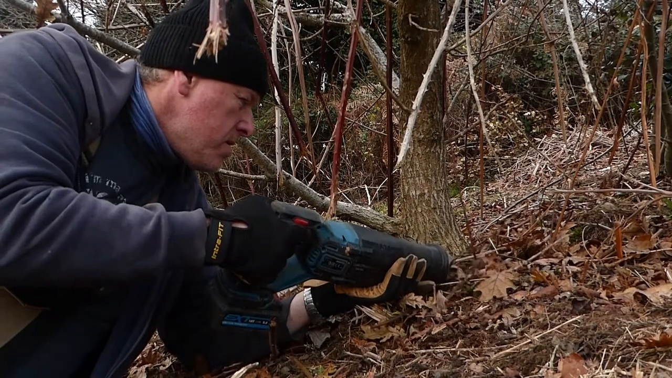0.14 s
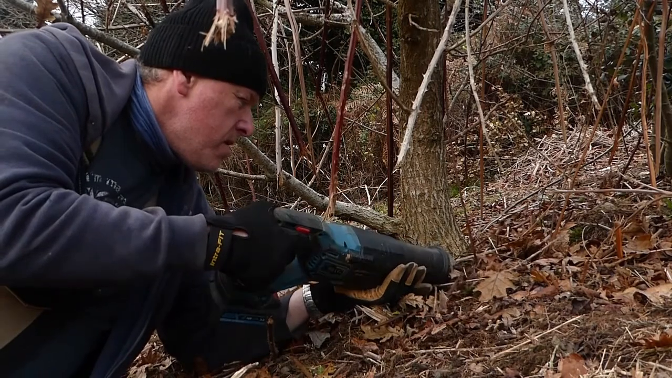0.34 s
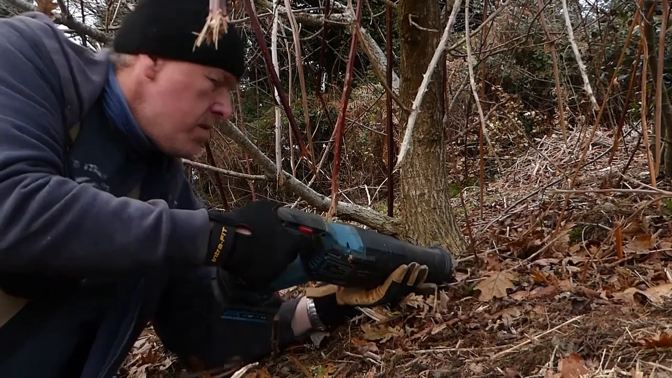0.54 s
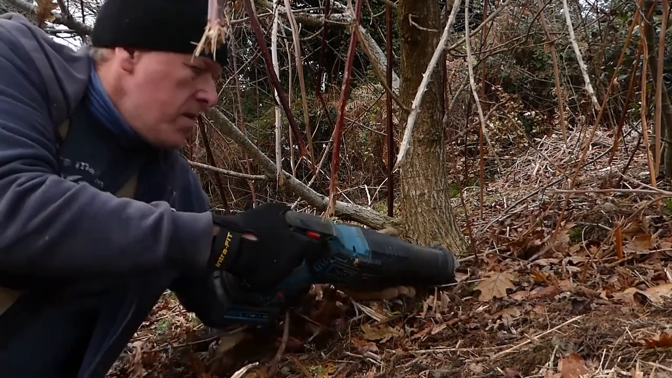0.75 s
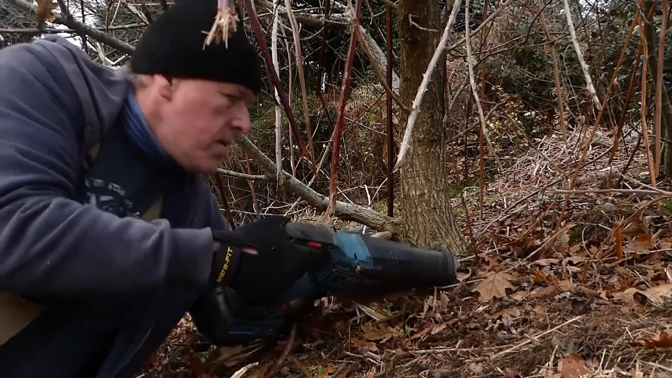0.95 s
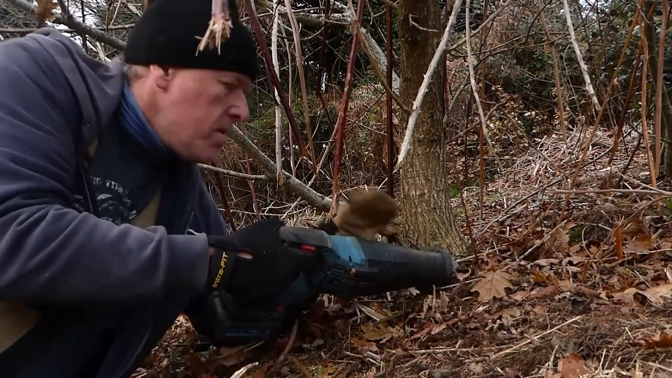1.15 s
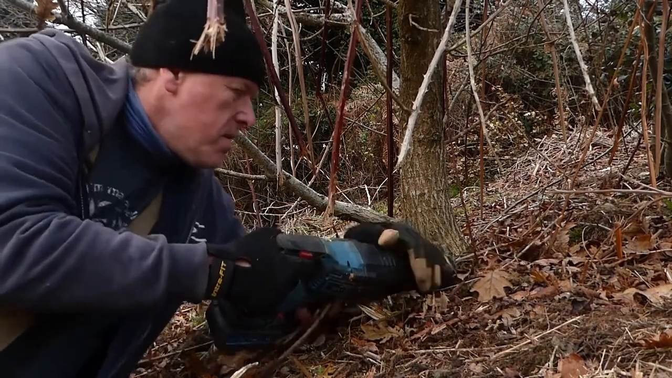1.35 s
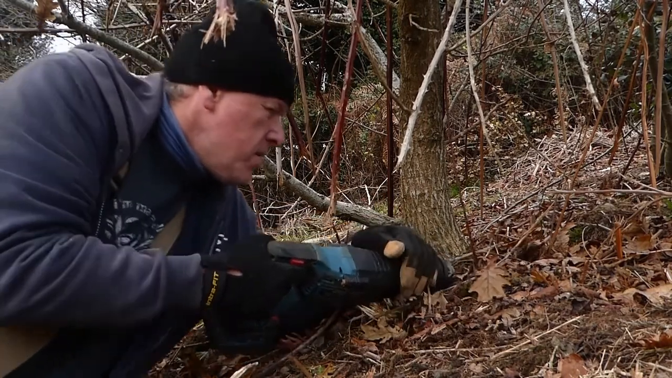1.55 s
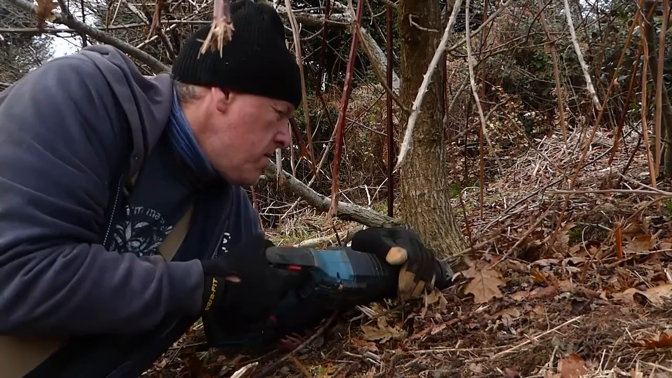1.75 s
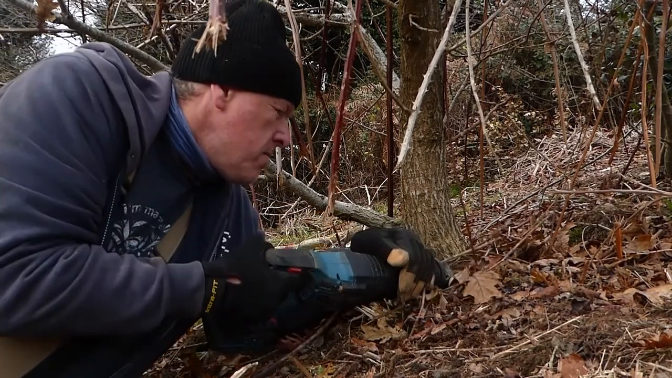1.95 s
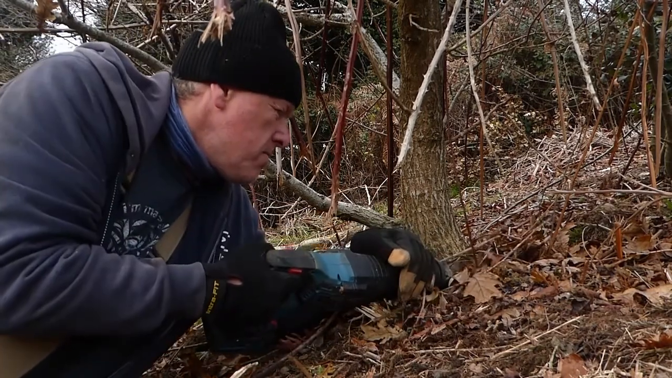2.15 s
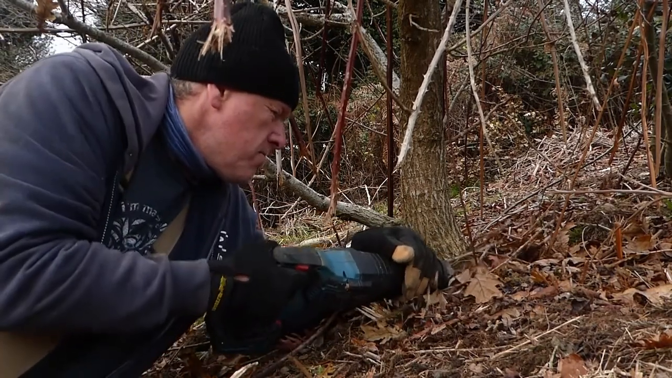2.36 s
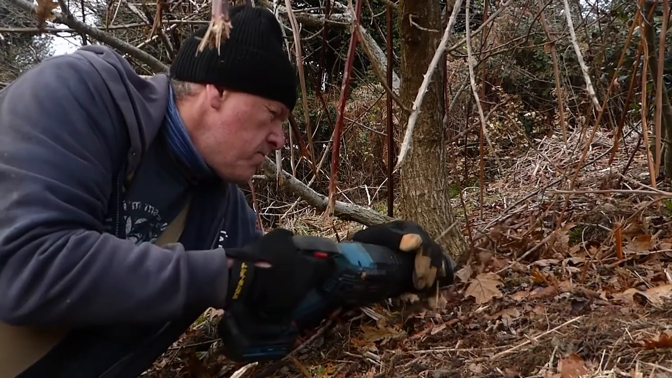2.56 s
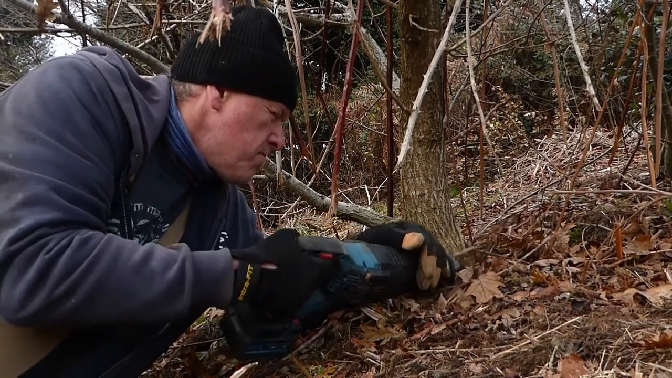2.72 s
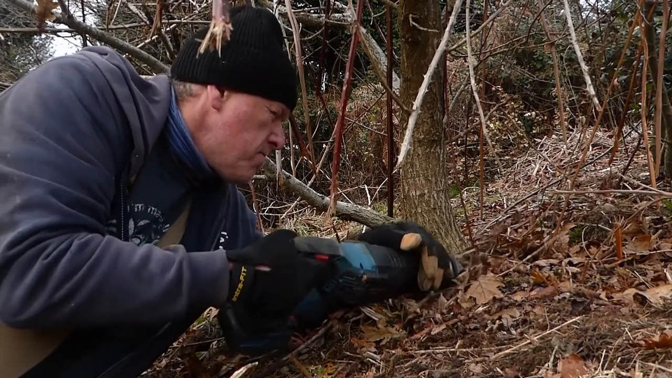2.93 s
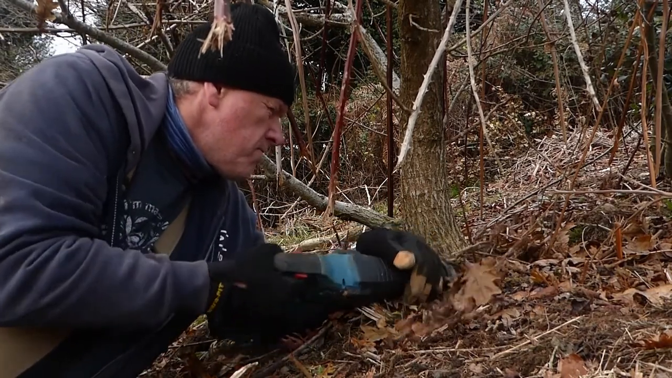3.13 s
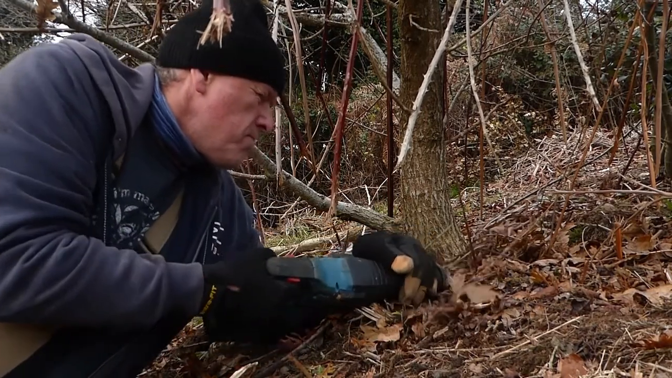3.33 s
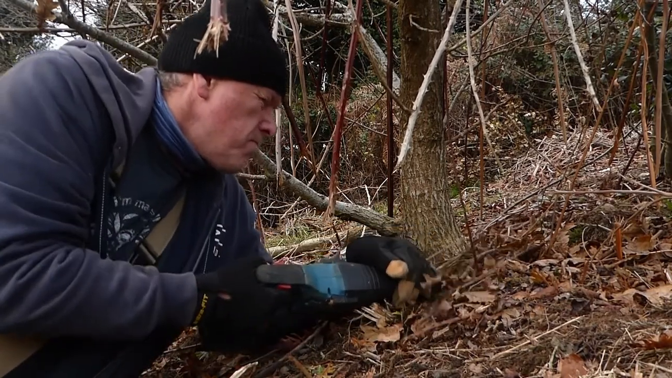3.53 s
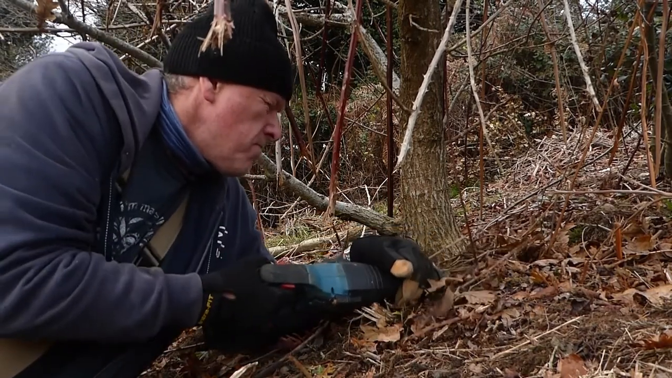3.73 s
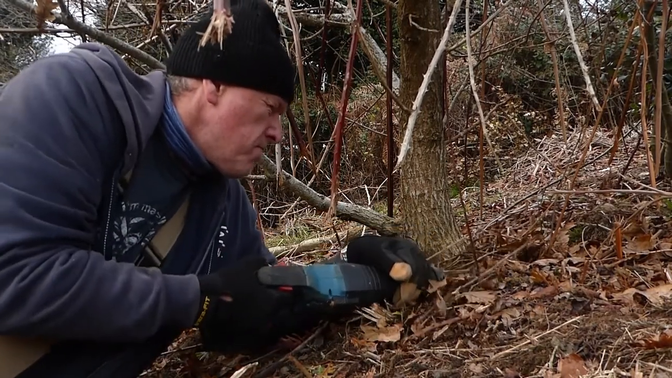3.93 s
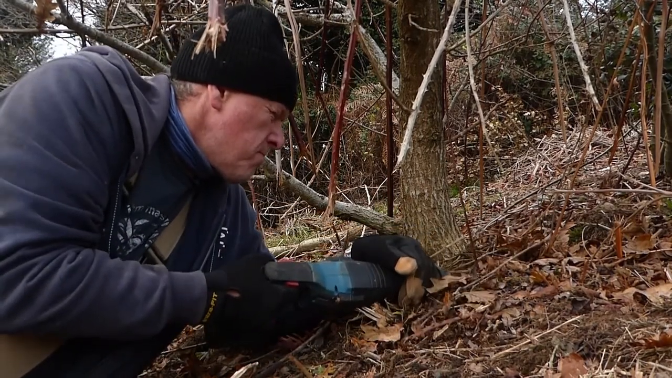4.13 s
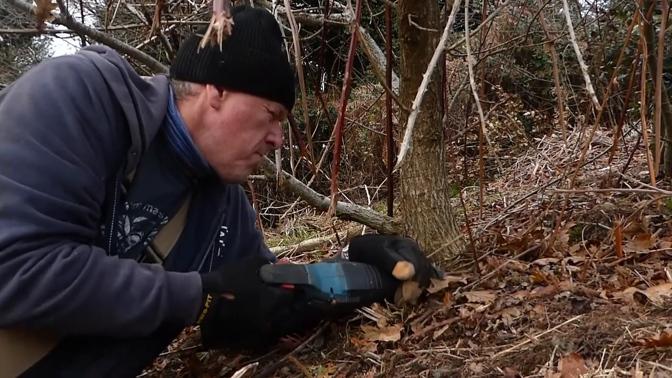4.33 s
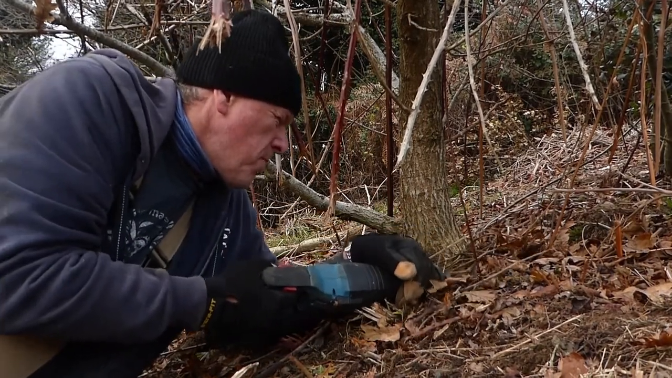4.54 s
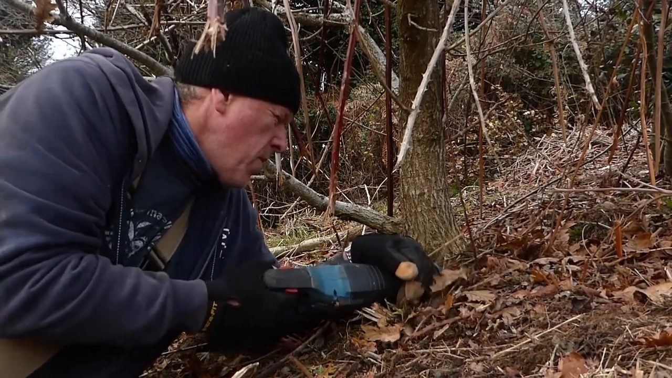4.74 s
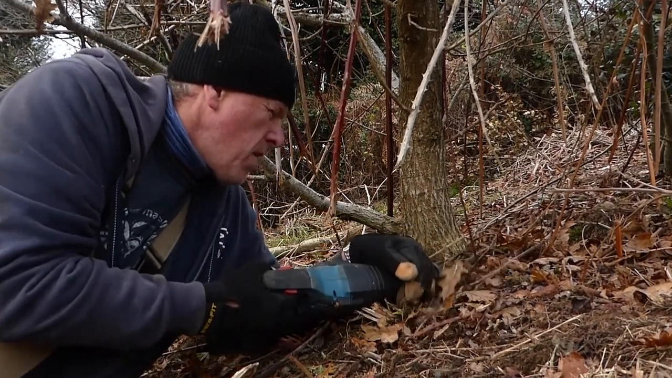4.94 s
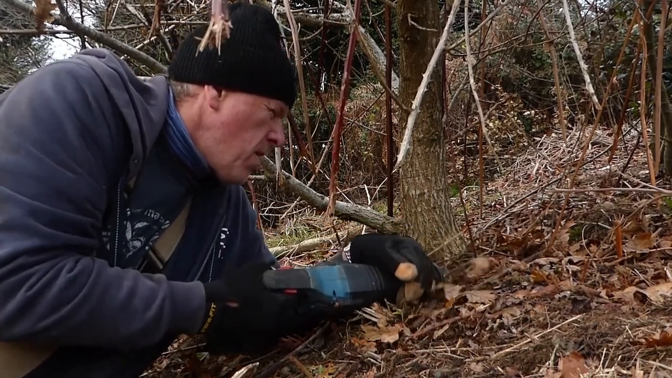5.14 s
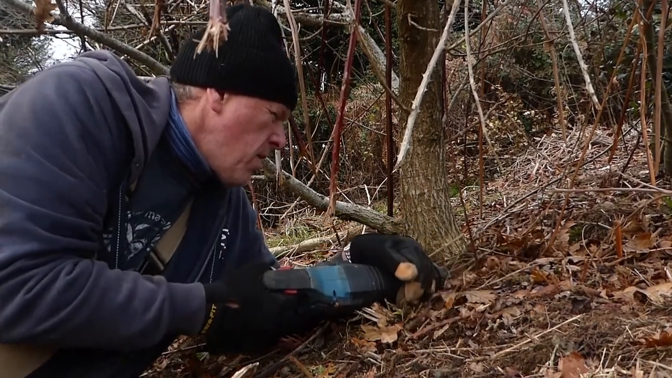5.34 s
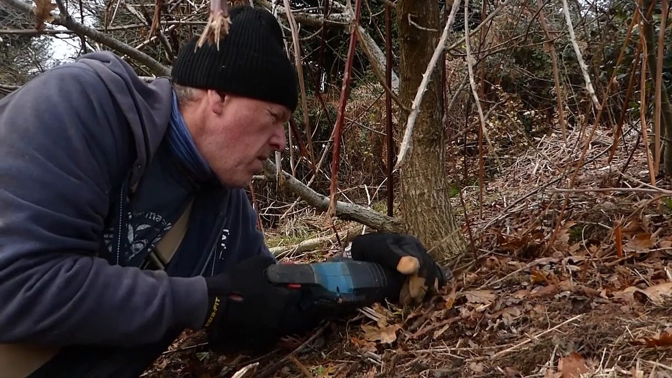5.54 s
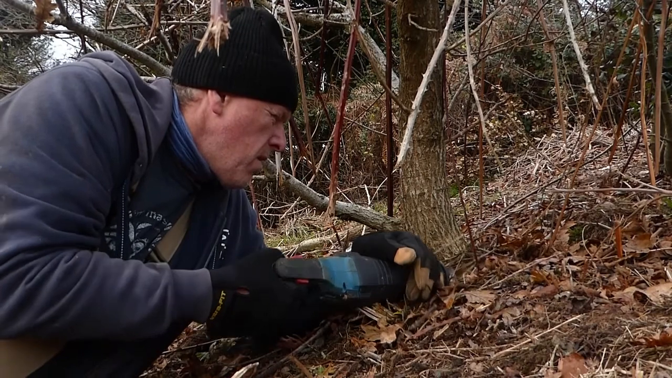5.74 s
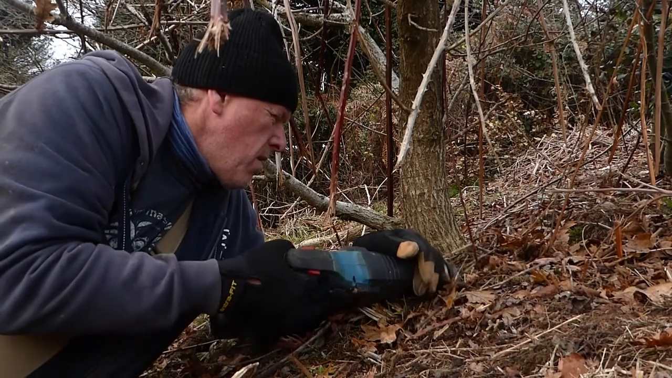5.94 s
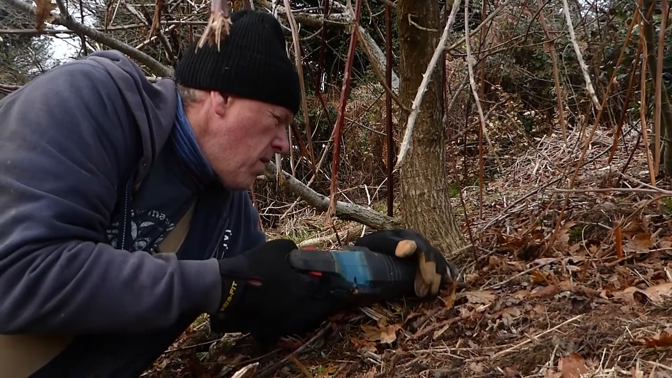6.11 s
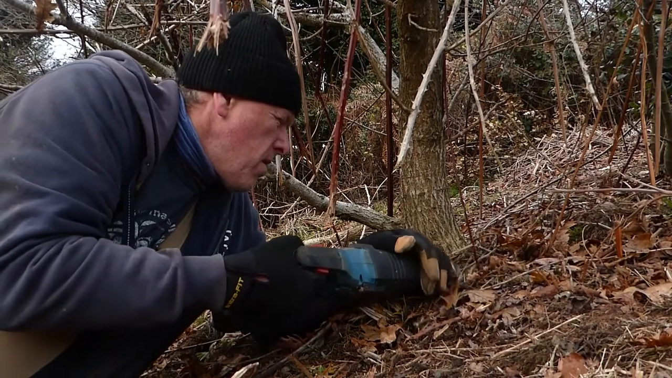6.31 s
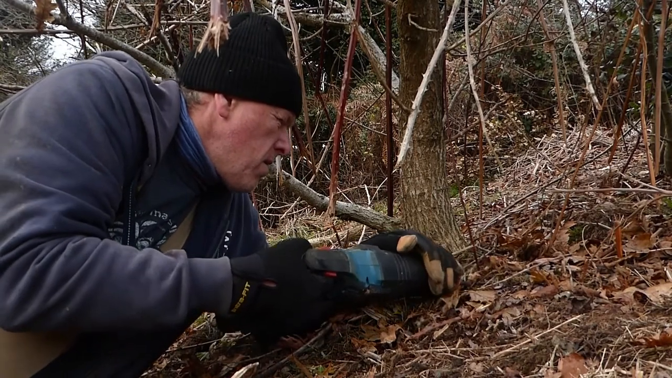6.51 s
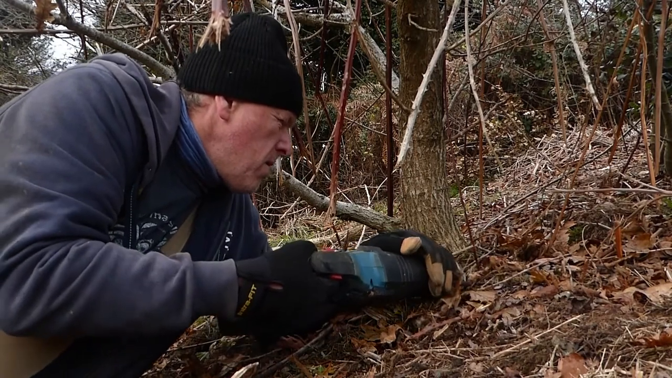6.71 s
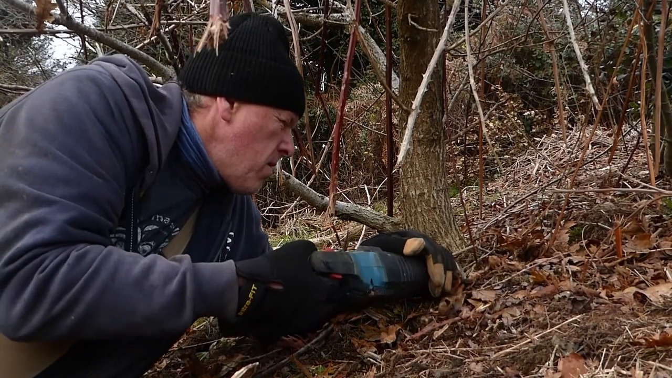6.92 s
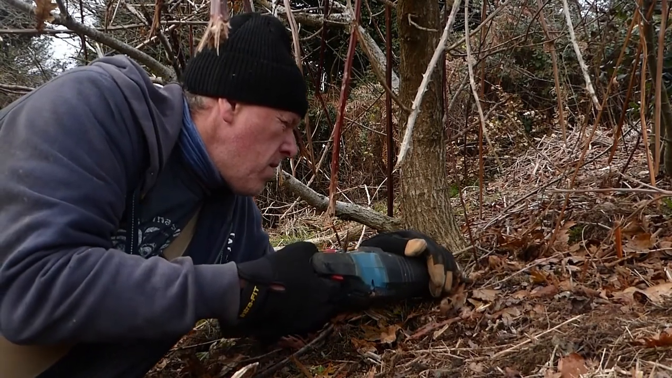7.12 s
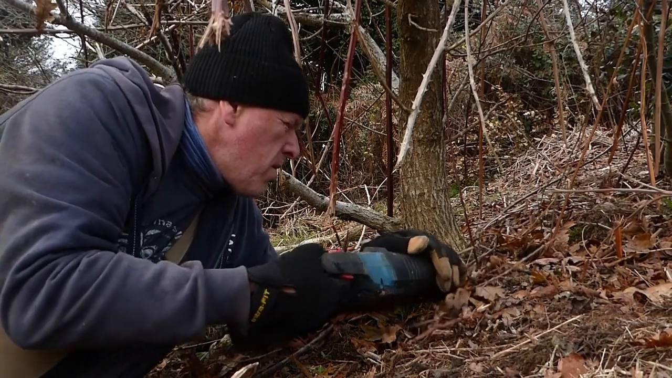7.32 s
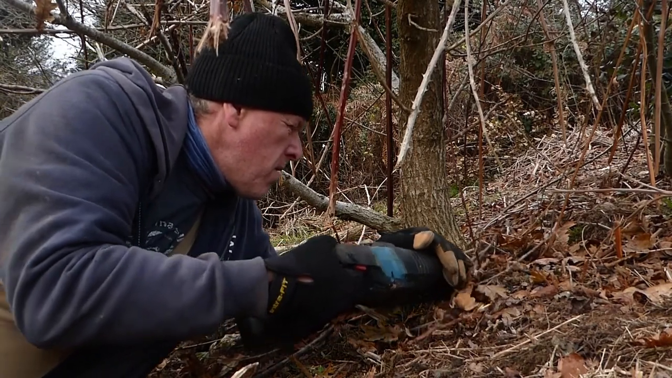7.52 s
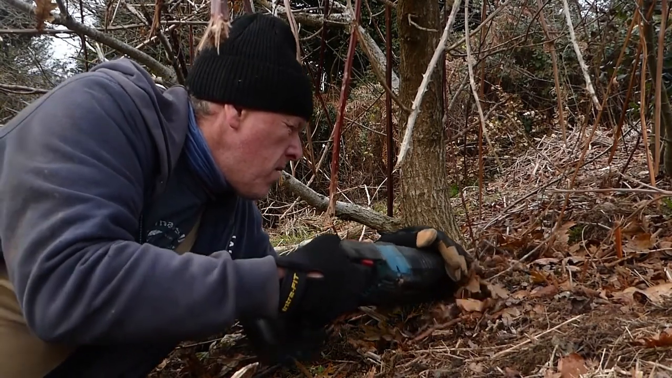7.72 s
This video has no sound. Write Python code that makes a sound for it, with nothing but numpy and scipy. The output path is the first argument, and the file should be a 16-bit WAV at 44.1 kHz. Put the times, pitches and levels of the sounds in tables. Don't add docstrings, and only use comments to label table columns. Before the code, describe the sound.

Close up in quiet woodland, a battery saw bursts briefly, stops amid glove and dry leaf rustling, then cuts hard wood in one long harsh clatter.

```python
import sys
import numpy as np
from scipy import signal
from scipy.fft import rfft, irfft, next_fast_len
from scipy.io import wavfile
from scipy.ndimage import uniform_filter1d, map_coordinates

SR = 44100
rng = np.random.default_rng(int(sys.argv[2]) if len(sys.argv) > 2 else 0)


def ratio_of_db(decibels):
    return 10 ** (np.asarray(decibels, float) / 20)


def unload_audio(sound):
    columns = np.transpose(np.atleast_2d(sound))
    steps = np.round(np.clip(columns, -1, 1) * 32767)
    wavfile.write(sys.argv[1], SR, steps.astype(np.int16))


N = 347067
STEP = 32
TIME_S = np.arange(N) / SR
CLOCK_S = np.arange(0, N + STEP, STEP) / SR
FULL_RATE_HZ = 44

# (time [s], stroke rate [1/s])
SPEED = [
    [(.12, 12.16), (.24, 42.5), (.34, 45.89), (.52, 46.24), (.61, 29.5), (.75, 12.74), (.84, 8.3)],
    [(1.67, 15.17), (1.8, 41.5), (1.88, 43.78), (2.2, 42.71), (2.36, 43.03), (2.52, 41.55), (2.6, 39.68),
     (2.76, 40.33), (3.24, 44.67), (3.4, 44.47), (3.48, 42.56), (3.64, 43.61), (4.36, 43.22), (4.6, 43.97),
     (4.76, 43.26), (5.16, 44.62), (5.56, 44.39), (6.2, 44.41), (6.6, 45.97), (6.76, 44.15), (7.24, 43),
     (7.4, 45.1), (7.48, 44.65), (7.56, 42.51), (7.72, 41.73), (7.87, 37.54)],
]
GRIPS = [0, 1.3, 2.47, 3.15, 4.62, 5.75, 6.42, 7.45]


def unit(x):
    return x / np.sqrt(np.mean(x ** 2) + 1e-20)


def along(points, hz):
    f, v = np.transpose(points)
    return np.interp(np.log(hz + 1), np.log(f + 1), v)


def curves(tables, off):
    out = np.full((len(tables[0][0]) - 1, N), float(off))
    for rows in tables:
        s, *cols = np.transpose(rows)
        inside = (TIME_S >= s[0]) & (TIME_S <= s[-1])
        out = np.where(inside, [np.interp(TIME_S, s, c) for c in cols], out)
    return out


def smooth(controls):
    return [np.interp(TIME_S, CLOCK_S, c) for c in controls]


def wobble(rate_hz):
    knots = rng.standard_normal(int(N * rate_hz / SR) + 4)
    return np.interp(TIME_S, CLOCK_S, map_coordinates(knots, [CLOCK_S * rate_hz]))


def swell(peak_s, rise_s, fall_s):
    t = CLOCK_S - peak_s
    return np.exp(np.where(t < 0, t / rise_s, -t / fall_s))


def present_grip():
    return np.searchsorted(GRIPS, CLOCK_S, side="right") - 1


def filtered(x, gain):
    m = next_fast_len(len(x) + 8192)
    cepstrum = irfft(np.log(gain(np.fft.rfftfreq(m, 1 / SR)) + 1e-6), m)
    cepstrum[1:m // 2] *= 2
    cepstrum[m // 2 + 1:] = 0
    return irfft(rfft(x, m) * np.exp(rfft(cepstrum)), m)[:len(x)]


def noise(spectrum):
    return unit(filtered(rng.standard_normal(N), lambda hz: ratio_of_db(along(spectrum, hz))))


def air():
    # (frequency [Hz], density [dB/Hz])
    air_tone = [(15, -44), (25, -30), (216, 4), (587, -12), (981, -6), (1640, -18), (1980, -18),
                (4000, -22), (11400, -27), (13800, -27), (15800, -46)]
    level_db, side_db = -52.5, -18
    mid = ratio_of_db(level_db) * noise(air_tone)
    side = ratio_of_db(level_db + side_db) * noise(air_tone)
    return mid, side


def rustle():
    # (peak [s], rise [s], fall [s], body level [dB], hiss level [dB])
    stirs = [(0, .01, 1, -68, -74), (.86, 0.012, 0.041, -37.5, -47), (.94, 0.035, 0.045, -58, -46),
             (1.07, 0.077, 0.095, -51, -53.5), (1.25, .04, .1, -67, -58), (1.32, 0.015, .04, -53, -46),
             (1.355, 0.023, 0.03, -48, -47), (1.4, .03, 0.017, -48, -46), (1.45, .02, .04, -58, -55),
             (1.537, 0.0091, 0.011, -59, -46), (1.62, 0.036, 0.026, -47, -68), (1.6, 0.23, 0.064, -52, -48)]
    # (frequency [Hz], density [dB/Hz])
    body_tone = [(120, -13), (200, -9.5), (433, -9.5), (474, -9.5), (2200, -20), (2860, -60), (4840, -120)]
    hiss_tone = [(1060, -18), (1800, 7), (8830, 4.5), (11100, 4.5), (12600, 0), (15800, -4)]
    swells = [ratio_of_db(np.c_[levels_db]) * swell(s, rise, fall) for s, rise, fall, *levels_db in stirs]
    low, high = smooth(sum(swells))
    lumps = wobble(110)
    cloth = low * ratio_of_db(2.2 * lumps) * noise(body_tone)
    leaves = high * ratio_of_db(1.3 * lumps + 1.6 * wobble(460)) * noise(hiss_tone)
    return cloth + leaves


def ticks():
    # (time [s], peak level [dB], pitch [Hz], low knock level [dB])
    snaps = [(0.039, -32, 5200, -17), (0.845, -14, 2900, -12), (.857, -28, 9500, -25),
             (.927, -30, 9500, -25), (1.0434, -35, 11500, -25), (1.12, -36, 11500, -25),
             (1.19, -39, 12500, -25), (1.5028, -29, 12000, -23), (1.43, -31, 4520, -8),
             (0.9133, -22, 11400, -17), (0.9424, -17.5, 3230, -8), (0.9608, -22, 2810, -21),
             (0.9746, -26, 2200, -5.5), (1.0006, -26, 2860, -17), (1.07, -30, 4960, -22),
             (1.132, -27, 6000, -11), (1.2206, -42, 3660, -16), (1.244, -31, 3740, -25),
             (1.3546, -33, 3730, -4), (1.5224, -26, 2910, -33), (1.5394, -25, 9160, -23),
             (1.5653, -25, 4700, -28), (1.584, -28, 3220, -17), (1.612, -26, 3280, -17)]
    snap_t60_s, knock_t60_s = .024, .03
    out, t = np.zeros(N + SR), np.arange(1500) / SR
    for s, db, hz, low_db in snaps:
        snap = rng.standard_normal((2, len(t))) * ratio_of_db(-60 * t / snap_t60_s)
        slow = uniform_filter1d(uniform_filter1d(snap[1], size=14), size=14)
        ring = .025 * snap[0] + 3.6 * slow * np.sin(2 * np.pi * hz * t)
        modes = sum(np.sin(2 * np.pi * f * t) for f in (480, 820, 1400))
        dull = modes * ratio_of_db(low_db + 1 - 60 * t / knock_t60_s)
        out[round(s * SR):][:len(t)] += ratio_of_db(db - 6) * (ring + dull)
    return out[:N]


def loudness():
    # (switch clack [s], motor grabs [s], released [s], blade stalls [s])
    runs = [
        (.108, 0.148, .52, 0.828),
        (1.649, 1.687, 5.3, 7.85),
    ]
    # (after pull [ms], thump [dB], knock [dB], housing [dB], song [dB])
    clacks = [
        (2, -58, -60, -25.5, -61),
        (14, -29, -30, -48, -57),
    ]
    # (thump [dB], knock [dB], housing [dB], song [dB])
    grip_db = [(-31.5, -28, -19, -28.5), (-28.5, -24, -20, -28), (-27, -25.5, -20.5, -26.5),
               (-28.5, -23, -21, -30), (-30, -23.5, -21.5, -30.5), (-29, -25, -21, -26),
               (-29.5, -26.5, -20.5, -27.5), (-31, -27, -20, -27.5)]
    # (time [s], level [dB], length [s])
    snags = [(1.742, 8, 0.064), (2.53, 3.5, 0.11), (2.85, 1, .25), (3.088, 4, 0.11), (3.866, 0.5, 0.11),
             (4.194, 3, 0.21), (4.3, 1, 0.089), (5.173, 4.5, 0.044), (6.563, 1, 0.13), (7.48, 1, 0.068)]
    # snag share [dB/dB], coast loss [dB per dB of speed], stall [dB/s]
    snag_share = [0.76, 0.29, 0.41, 0.56]
    coast = [0.53, 0.63, 0.94, 1]
    stall_db_per_s = [150, 220, 200, 250]
    # motor surge before the teeth bite [dB], its fall [s], unsteadiness [dB]
    surge_peak_db = [5.3, 6.6, 7.2, 2.5]
    surge_fall_s = [0.025, 0.013, 0.019, 0.066]
    unsteady_db = [0.43, 0.21, 0.2, 0.32]
    regrip_s, grab_rise_s = .48, .0086
    clack_rise_s, clack_fall_s = .0017, .015

    t, col = CLOCK_S, lambda v: np.c_[v]
    held_db = np.transpose(grip_db)[:, present_grip()]
    held_db = uniform_filter1d(held_db, size=round(regrip_s * SR / STEP), axis=1)
    held_db = held_db + col(snag_share) * sum(db * swell(s, length / 2, length / 2) for s, db, length in snags)
    rate = np.interp(t, TIME_S, curves(SPEED, 0)[0])
    slowed_db = 20 * np.log10(np.clip(rate / FULL_RATE_HZ, .16, 1))
    gain = np.zeros((4, len(t)))
    for (pull, grab, release, stall), (stop, *_) in zip(runs, runs[1:] + [(N,)]):
        lost_db = col(coast) * slowed_db * (t > release)
        lost_db = lost_db - col(stall_db_per_s) * np.maximum(t - stall, 0)
        surge_db = col(surge_peak_db) * [swell(grab, 1, fall) for fall in surge_fall_s]
        on = np.where(t < grab, swell(grab, grab_rise_s, 1), 1) * (t > pull) * (t < stop)
        clack = sum(ratio_of_db(col(levels_db)) * swell(pull + ms / 1000, clack_rise_s, clack_fall_s)
                    for ms, *levels_db in clacks)
        gain += on * ratio_of_db(held_db + lost_db + surge_db) + clack * (t > pull)
    low_high = np.array([wobble(14), wobble(15)])[[0, 0, 1, 1]]
    return smooth(gain) * ratio_of_db(col(unsteady_db) * (wobble(9) + low_high))


def contacts(return_db, scatter_db, jitter_ms):
    start_turn = [.765, .03]
    first_bite = [.17, 1.71]
    # (after stroke end [ms], thump [dB], knock [dB], housing [dB], song [dB], timing drift [ms])
    forward = [
        (-3.2, -13, -4, -3, -3, .2),
        (-1.9, 0, -8, -3.5, -3, .1),
        (-.5, -11, 0, 0, 0, .06),
        (1.2, -30, -12, -7, -3, .3),
        (3.4, -12, -16, -12, -2, .4),
    ]
    backward = [
        (-2.5, -5, -7, -9, -5, .15),
        (-0.5, -30, 0, 3, 4.5, .1),
        (2, -32, -6, -10, 3, .4),
    ]
    recoil = (-.6, -6, -30, -30, -30, .4)
    # (stroke phase [half turns], share of return_db, contact)
    blows = [(0, 0, c) for c in forward] + [(1, 1, c) for c in backward] + [(.98, .04, recoil)]
    hits = np.zeros((4, N))
    for rows, start, bite in zip(SPEED, start_turn, first_bite):
        t = np.arange(round(rows[0][0] * SR), min(N, round(rows[-1][0] * SR)))
        speed = np.interp(t / SR, *np.transpose(rows))
        turn = start + np.cumsum(speed) / SR
        whole = np.arange(int(turn[-1]) + 2)
        for back, play, (after_ms, *levels_db, drift_ms) in blows:
            chance = rng.standard_normal((len(whole), 6))
            end = np.interp(whole + back / 2, turn, t)
            pinch = np.where((end > 3 * SR) & (end < 3.4 * SR), 2.5, 1)
            drift = unit(uniform_filter1d(chance[:, 0], size=15))
            late_ms = after_ms + drift_ms * .66 * drift + jitter_ms * pinch * chance[:, 1]
            at = (end + late_ms * SR / 1000).astype(int).clip(0, N - 1)
            live = (end > bite * SR) & (whole + back / 2 < turn[-1])
            slow = (FULL_RATE_HZ / np.interp(at, t, speed)) ** .25
            scatter = np.c_[scatter_db] * chance[:, 2:].T
            size = ratio_of_db(np.array(levels_db)[:, None] + play * return_db[:, at] + scatter)
            hits[:, at[live]] += (slow * size)[:, live]
    return hits


def rasp(hits, drag_db, rise_ms, fall_ms, steady_db, grit_db):
    t_ms = np.arange(900) / SR * 1000
    shape = (1 - np.exp(-t_ms / rise_ms)) * np.exp(-t_ms / fall_ms)
    flare = signal.fftconvolve(hits, shape)[:N]
    grit = ratio_of_db(grit_db * wobble(700)) * rng.standard_normal(N)
    steady = ratio_of_db(steady_db + drag_db + .16 * wobble(60))
    return unit((unit(flare) + steady) * grit)


def shake():
    # (multiple of stroke rate, level [dB re thump])
    inertia = [(2, -65), (3, -22.5), (4, -18), (5, -13), (6, -17)]
    multiples = [
        [5, 7],
        [7, 9, 10, 19, 23],
        [5, 8, 9, 19],
        [7, 8, 9, 10, 22, 23, 24, 29, 31],
        [8, 10, 12, 14, 15, 17, 23, 24],
        [14, 15, 17, 21, 23, 24],
        [8, 11, 21, 22, 23, 24],
        [5, 6, 7, 8, 14, 23],
    ]
    multiples_db = [
        [-15, -30],
        [-4.5, -9, -13, -9, -5],
        [-16, -8, -11, -9.5],
        [-12, -8, -7.5, -9, -6.5, -7.5, -12, -9.5, -8.5],
        [-10, -12, -12, -10, -9.5, -14, -7, -22],
        [-7, -14, -9, -11, -11, -19],
        [-11, -9, -13, -13, -12, -14],
        [-6.5, -8, -7, -9, -6.5, -12],
    ]
    speed = curves(SPEED, 0)[0]
    angle = 2 * np.pi * np.cumsum(speed) / SR
    force = np.minimum(speed / 40, 1) ** 8
    grip, sway = present_grip(), wobble(5)[::STEP]
    gains = {}
    for g, rows in enumerate(zip(multiples, multiples_db)):
        share = uniform_filter1d(1. * (grip == g), size=250)
        for k, db in zip(*rows):
            gains[k] = gains.get(k, 0) + ratio_of_db(db) * share
    total = np.zeros(N)
    for k, gain in zip(gains, smooth(gains.values())):
        drift_db = 3 * np.roll(sway, 97 * k)[np.arange(N) // STEP]
        total += gain * ratio_of_db(drift_db) * np.sin(k * (angle + 1.45))
    for k, db in inertia:
        total += ratio_of_db(db + .35 * k * wobble(4)) * np.sin(k * angle + k * k)
    return force * total


def body(x, grips, tone, lift_db):
    which = np.searchsorted(GRIPS, TIME_S, side="right") - 1
    out = np.zeros(N)
    for k, modes in enumerate(grips):
        share = uniform_filter1d(1. * (which == k), size=9000)
        held = np.flatnonzero(share > 1e-6)
        span = slice(held[0], held[-1] + 1)

        def response(f):
            peaks = sum(ratio_of_db(db + lift_db) ** 2 / (1 + (2 * (f - c) / w) ** 2) for c, w, db in modes)
            return ratio_of_db(along(tone, f)) * np.sqrt(1 + peaks)
        out[span] += share[span] * unit(filtered(x[span], response))
    return out


def thump(hits, drag_db):
    # (frequency [Hz], width [Hz], level [dB])
    modes = [
        [(209, 19, 9)],
        [(304, 4.6, 4), (398, 2.8, 9)],
        [(210, 18, 19), (330, 30, 16), (379, 20, 23), (500, 270, 17.5)],
        [(363, 210, -5)],
        [(350, 170, 6), (437, 11, 11), (540, 35, 4.5)],
        [(312, 84, 11), (458, 36, 13), (643, 14, 16.5)],
        [(315, 22, 5), (475, 15, 9)],
        [(197, 15, 22), (340, 110, 8), (610, 49, 8)],
    ]
    # (frequency [Hz], level [dB])
    tone = [(60, -89), (150, -44.5), (240, -6), (300, 4), (550, 1.5), (900, -4.5), (2000, -62)]
    push = unit(hits) + ratio_of_db(-8.5) * rasp(hits, drag_db, .6, 4, steady_db=5, grit_db=1.5)
    return ratio_of_db(-.5) * body(push, modes, tone, lift_db=3) + ratio_of_db(2) * shake()


def trunk(hits, drag_db):
    # (frequency [Hz], width [Hz], level [dB])
    modes = [
        [(764, 1900, 6), (1330, 56, -3)],
        [(790, 64, 1.7), (970, 410, 2.9), (1270, 150, 2.8)],
        [(793, 15, -4), (1017, 40, -0.5)],
        [(805, 28, -11), (990, 120, -8), (1320, 150, -9)],
        [(1050, 350, 3.5), (1380, 120, 1.4), (1920, 100, 15.6)],
        [(1100, 260, 3), (1613, 26, 13.5), (1870, 64, 12)],
        [(1050, 110, -0.5), (1610, 36, 10), (1850, 52, 10)],
        [(963, 51, 0), (1293, 30, 0)],
    ]
    # (frequency [Hz], level [dB])
    tone = [(300, -44), (600, 0), (1400, -1), (1650, -15.5), (2100, -16), (4000, -60.5)]
    knock = unit(hits) + ratio_of_db(-6) * rasp(hits, drag_db, .5, 1.6, steady_db=-1.5, grit_db=1.5)
    return body(knock, modes, tone, lift_db=9)


def housing(hits, drag_db):
    # (frequency [Hz], width [Hz], level [dB])
    modes = [
        [(2910, 250, -3), (3800, 790, -3), (4970, 190, -0.5), (6300, 190, -13)],
        [(2200, 300, 1.1), (3030, 1300, 0.83), (4050, 390, 0), (6320, 190, 1.5)],
        [(3220, 1100, -5.5), (4370, 29, 3), (6500, 520, -1.5)],
        [(2450, 1000, -2), (3170, 5.9, 11.5), (4170, 490, 0.5), (6390, 47, 5.5)],
        [(2000, 180, -31), (2860, 180, -3.5), (4120, 410, -3.5), (6470, 130, -0.5)],
        [(1910, 92, -2), (3400, 1000, -4.5), (4970, 110, -5), (6220, 67, 3.5)],
        [(2814, 470, 2), (4200, 360, -0.5), (5100, 43, 1), (6000, 540, -0.5)],
        [(2240, 24, 4.5), (2800, 160, -3), (4400, 100, -1), (4840, 55, -5)],
    ]
    # (frequency [Hz], level [dB])
    tone = [(900, -43), (1700, -6), (3000, -2), (4600, -5.5), (6500, -11.5), (8000, -23.5), (14000, -107)]
    rattle = ratio_of_db(-7) * unit(hits) + rasp(hits, drag_db, .4, 1, steady_db=-1.6, grit_db=.8)
    return body(rattle, modes, tone, lift_db=6)


def blade(hits, drag_db):
    # (frequency [Hz], width [Hz], level [dB])
    modes = [
        [(9060, 65, -10), (9500, 120, -4), (10800, 120, 0)],
        [(9240, 510, 0), (10100, 35, 0), (10750, 640, -1.8)],
        [(9050, 72, -1), (9900, 600, -1.5), (11060, 57, 5)],
        [(8750, 120, -2), (10200, 330, -8), (13200, 400, -14)],
        [(8600, 190, -2), (10000, 130, 1), (10400, 140, -7)],
        [(9340, 390, 6), (10200, 840, -4), (14200, 89, -20)],
        [(9300, 940, 2.5), (12000, 110, -14), (13600, 120, -14)],
        [(8300, 58, 1), (9100, 410, -3), (10200, 73, -3)],
    ]
    # (frequency [Hz], level [dB])
    tone = [(5000, -11.5), (7800, -7.5), (10000, -1.5), (12000, -10), (15500, -15.5), (20000, -40)]
    scrape = rasp(hits, drag_db, .7, 3, steady_db=3.8, grit_db=2.5)
    return body(scrape, modes, tone, lift_db=5.5)


def saw():
    # (time [s], thump [dB], knock [dB], housing [dB])
    backlash = [
        [(0, -27, 1, 0), (.5, -35, -5, -7), (.8, -35, -7, -2), (1.7, -7, -1.5, 0), (2.44, 0, 1.5, 0),
         (2.5, 11, 2, -3), (2.98, 15.5, 3, -4), (3.04, -25, -9, -7), (3.35, -12, -14, -3), (3.5, -11, -4, -2.5),
         (3.8, -12, -11, -2.5), (3.9, -15, -13, -9), (4.05, -14, -1.5, -3), (4.72, -12, -4, 0),
         (4.85, -18, -8, -6), (5.05, -20, -7, -2.5), (5.25, -23, -14, -4), (5.65, -29, -7, -5.5),
         (5.8, -20, -11, -6), (6.35, -18, -6, -4), (6.5, -13, -8, 0), (6.7, -14, -4, -3), (6.9, -6, -3, -1),
         (7.35, -5, 0, 0), (7.5, 8, -1, -2.5), (7.87, 10, -1, -5)],
    ]
    backlash_db = curves(backlash, 0)
    song_db = .4 * backlash_db[2:]
    hits = contacts(np.r_[backlash_db, song_db], scatter_db=[1.2, 1, .7, 2.5], jitter_ms=.065)
    slowness = np.clip(1 - curves(SPEED, 0)[0] / FULL_RATE_HZ, 0, 1)
    drag_db = 3.5 * slowness + 1.5 * (TIME_S < .6)
    parts = [part(row, drag_db) for part, row in zip((thump, trunk, housing, blade), hits)]
    return sum(gain * part for gain, part in zip(loudness(), parts))


def ground(x):
    out, step, echo_t60_s = np.zeros(N + SR), 8192, .07
    for at in range(0, N, step):
        echo = rng.standard_normal(3000) * ratio_of_db(-60 * np.arange(3000) / SR / echo_t60_s)
        piece = np.pad(x, (step, step))[at:at + 2 * step]
        faded = piece * np.hanning(2 * step)[:len(piece)]
        out[at:][:len(piece) + 2999] += signal.fftconvolve(faded, echo / np.linalg.norm(echo))
    return out[step:][:N]


def scene():
    # (frequency [Hz], side re mid [dB])
    width = [(60, -8), (110, -24), (200, -45), (380, -27), (700, -21.5), (1290, -13.5), (2380, -20),
             (4400, -17.5), (8120, -17), (12000, -12.5), (15000, -10)]
    glove_side_db = -11.5
    air_mid, air_side = air()
    near = rustle() + ticks()
    cut = saw()
    mid = cut + near + air_mid
    side = filtered(ground(cut), lambda hz: ratio_of_db(along(width, hz)))
    side = side + ratio_of_db(glove_side_db) * ground(near) + air_side
    return np.array([mid + side, mid - side])


def band_limit(x):
    return signal.sosfilt(signal.butter(12, 16510, fs=SR, output="sos"), x)


def record(dry):
    low_cut_hz, top_hz, ceiling = 85, 15780, 1.05
    m = next_fast_len(N)
    hz = np.fft.rfftfreq(m, 1 / SR)
    rounded = dry / (1 + np.abs(dry / ceiling) ** 4) ** (1 / 4)
    response = (hz < top_hz) * hz ** 4 / (hz ** 4 + low_cut_hz ** 4)
    heard = irfft(rfft(rounded, m) * response, m)[:, :N]
    return band_limit(heard)


dry = scene()
out = record(dry)
unload_audio(out)
```